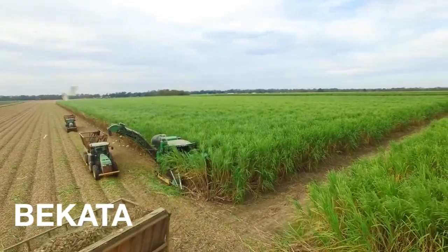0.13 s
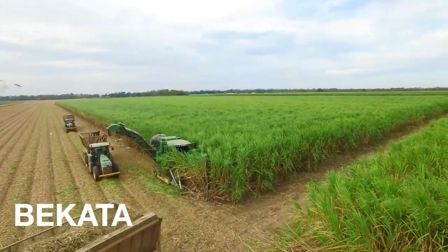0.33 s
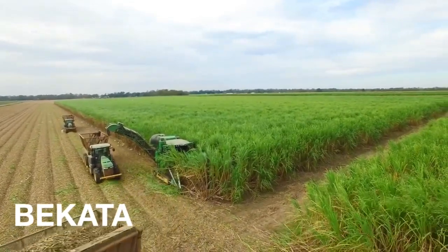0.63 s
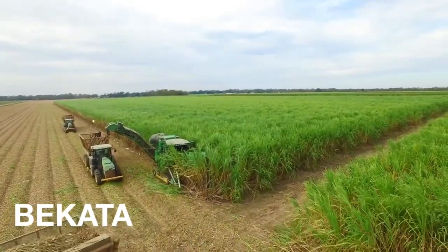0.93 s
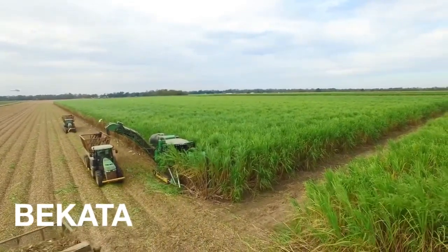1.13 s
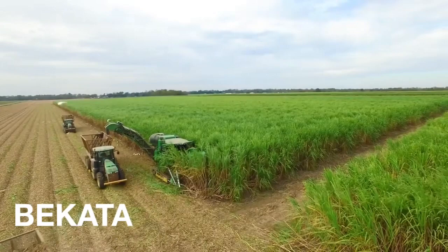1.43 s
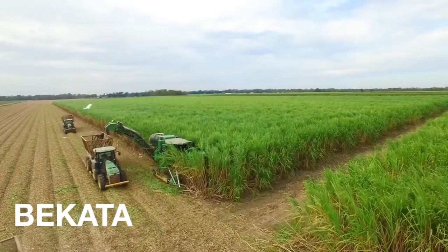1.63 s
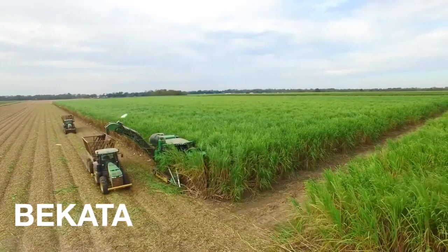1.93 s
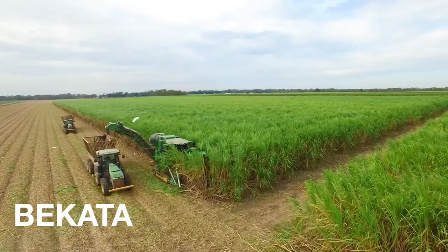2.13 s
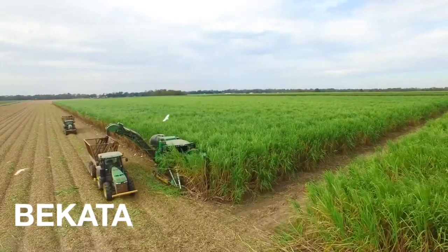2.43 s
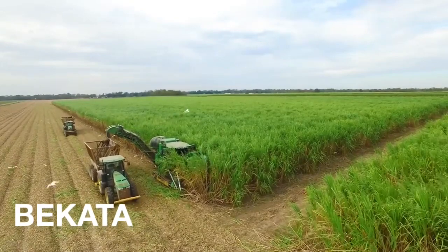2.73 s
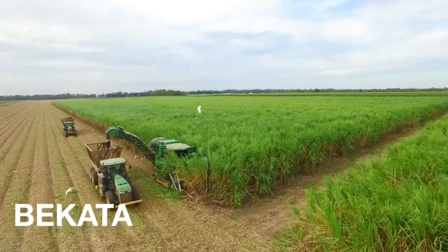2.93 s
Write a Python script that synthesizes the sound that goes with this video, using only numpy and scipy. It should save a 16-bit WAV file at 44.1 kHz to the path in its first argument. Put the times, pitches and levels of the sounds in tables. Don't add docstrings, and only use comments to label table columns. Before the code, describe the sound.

Sugarcane harvester rumbles close by, then cuts to buffeting wind over distant machine roar

```python
import sys
import numpy as np
from scipy import signal
from scipy.fft import rfft, irfft, next_fast_len
from scipy.io import wavfile
from scipy.ndimage import uniform_filter1d

SR = 44100
rng = np.random.default_rng(int(sys.argv[2]) if len(sys.argv) > 2 else 0)


def transcribe(u):
    v = np.clip(np.atleast_2d(u).T, -1, 1)
    q = np.round(v * 32767).astype(np.int16)
    wavfile.write(sys.argv[1], SR, q)


def elevation(decibels):
    levels = np.asarray(decibels, float)
    return 10 ** (levels / 20)


N = 136269
T = np.arange(N) / SR

# frequency in Hz, density in dB per Hz.
NEAR_RUMBLE = [(28, -14), (50, 1.5), (195, -3.5), (235, -9), (400, -19), (650, -12.5), (1200, -15.5),
               (2600, -19)]
# frequency in Hz, density in dB per Hz.
NEAR_HISS = [(2600, -2), (3440, -0.5), (4920, -6), (5910, -3.5), (7260, -6), (10000, -7), (10500, -11),
             (16500, -19)]
# pitch in Hz, width in Hz, level in dB.
PANELS = [(638, 93, 3.5), (1016, 46, 0.5), (1436, 43, 2), (1784, 13, -2), (2000, 12, -14), (2080, 26, 3)]
# time in seconds, level in dB.
GUSTS = [
    (0.25, -37.5),
    (0.37, -34),
    (0.97, -33.5),
    (1.35, -33),
    (1.78, -31.5),
    (2.17, -33),
    (2.54, -31),
    (2.69, -33),
    (3.09, -33),
]
# frequency in Hz, density in dB per Hz.
WIND_COLOUR = [(22, -13), (45, 1.5), (86, -3), (140, -5), (216, -11.5), (280, -15.5), (305, -36.5),
               (340, -70)]
# time in seconds, peak in dB, pitch in Hz, length in seconds.
EDDIES = [(0.495, -17.5, 61.4, 0.012), (.528, -20, 62.5, 0.0065), (.6, -23.5, 63, 0.015),
          (.635, -26, 121, 0.0206), (.85, -28, 65, 0.017), (.99, -23.5, 50.6, 0.022),
          (1.04, -28, 49.3, 0.014), (0.814, -25, 71, 0.012), (0.899, -18.5, 69.5, 0.014),
          (1.081, -15.5, 65, 0.01), (1.212, -24, 106, 0.0078), (1.33, -23, 57, 0.017),
          (1.437, -25, 75, 0.026), (1.547, -23.5, 59.5, 0.011), (1.593, -22.5, 61.4, 0.024),
          (1.912, -20.5, 90, 0.0089), (1.234, -26.5, 51, .025), (1.72, -23.5, 91, 0.014),
          (2.0, -27.5, 141.4, 0.018), (2.3, -32, 74, 0.015), (2.102, -21, 86, 0.0092),
          (2.391, -13.5, 84, .012), (2.419, -16.5, 82.4, 0.011), (2.551, -18.5, 80.4, .022),
          (2.596, -20, 88.5, 0.012), (2.643, -18, 92.5, 0.015), (2.887, -21.5, 102, 0.013),
          (2.912, -26.5, 50, 0.02)]
# time in seconds, roar in dB, rustle in dB.
FAR_EFFORT = [
    (0.25, -41.5, -56.5),
    (0.42, -38, -54),
    (0.55, -38, -53),
    (1.6, -35.5, -50),
    (2.13, -35.5, -49),
    (2.46, -37.5, -52),
    (3.09, -37, -51),
]
# frequency in Hz, density in dB per Hz.
ROAR_COLOUR = [(310, -26), (530, -12.5), (856, -1.5), (1080, 1), (1760, -2), (2070, -1), (3610, -12),
               (4800, -18.5), (6240, -66), (10600, -120)]
# frequency in Hz, density in dB per Hz.
DRONE_COLOUR = [(180, -4), (300, -8), (345, -1.5), (442, 6), (488, -3.5), (530, -18), (690, -41),
                (1170, -120)]
# frequency in Hz, density in dB per Hz.
RUSTLE_COLOUR = [(4300, -24), (4800, -3), (6600, -4), (7200, -3.5), (10000, -11), (10400, -16),
                 (15200, -24), (16000, -34)]
# pitch in Hz, level in dB, width in Hz.
WHINES = [(440.7, -59, 7.2), (1050, -57.5, 34), (1165, -59, 22), (2060, -56, 29), (3745, -63, 60),
          (7030, -80, 32)]
# time in seconds, peak in dB, pitch in Hz.
SNAPS = [
    (.4, -31, 4150),
    (.553, -46, 6500),
    (2.733, -39, 3900),
    (2.744, -45, 8500),
    (2.7502, -38, 3620),
    (2.9605, -40, 8300),
    (2.998, -53, 13000),
    (3.086, -48, 12500),
]
# frame number, lowest thinned Hz, share of lines kept, level of the rest in dB.
HOLLOWS = [
    (4, 4000, .04, -20),
    (32, 3400, .04, -21),
    (48, 3000, .07, -22),
    (51, 4200, .04, -24),
    (117, 3400, .08, -20),
]


def rms_one(x):
    return x / np.sqrt(np.mean(x ** 2) + 1e-20)


def in_time(rows):
    seconds, *columns = np.transpose(rows)
    return [np.interp(T, seconds, column) for column in columns]


def drift(rate_hz):
    r = np.exp(-80 * np.pi * rate_hz / SR)
    draws = rng.standard_normal(N // 40 + 2002)
    slow = signal.lfilter([1], [1, -2 * r, r * r], draws)[2000:]
    return np.interp(np.arange(N) / 40, np.arange(len(slow)), rms_one(slow))


def ring(x, hz, width_hz):
    r = np.exp(-np.pi * width_hz / SR)
    edge = (1 - r * r) / 2
    return signal.lfilter([edge, 0, -edge], [1, -2 * r * np.cos(2 * np.pi * hz / SR), r * r], x + 1e-18)


def ringing_noise(hz, width_hz):
    return ring(ring(rng.standard_normal(N), hz, width_hz), hz, width_hz)


def even(x):
    power = uniform_filter1d(x ** 2 + 1e-9, int(0.0417 * SR))
    return rms_one(x / power ** 0.33)


def turbulence(spectrum, shared_db, own_db, rate):
    hz, db = np.transpose(spectrum)
    size = next_fast_len(N)
    octave = np.log2(np.maximum(np.arange(size // 2 + 1) * SR / size, 1))
    colour = elevation(np.interp(octave, np.log2(hz), db, left=-120, right=-120))
    body = rfft(rng.standard_normal(size)) * colour
    out, shared = 0, shared_db * drift(rate)
    heard = np.log2(hz[db > -60])
    for centre in np.arange(np.floor(2 * heard[0]) / 2, heard[-1] + .5, .5):
        band = np.cos(np.pi * np.clip(octave - centre, -.5, .5)) ** 2
        flicker = elevation(shared + own_db * drift(rate * 1.85))
        out = out + irfft(body * band, size)[:N] * flicker
    return rms_one(out)


def near_panels():
    panels = 0
    for hz, width_hz, db in PANELS:
        panels = panels + elevation(db) * even(ring(rng.standard_normal(N), hz, width_hz))
    return rms_one(panels)


def near_machine():
    rumble = even(turbulence(NEAR_RUMBLE, shared_db=-1.0, own_db=-0.2, rate=58))
    hiss = turbulence(NEAR_HISS, shared_db=1.0, own_db=0.1, rate=81)
    return elevation(-27) * rumble + elevation(-34) * near_panels() + elevation(-35.5) * hiss


def eddies():
    front_hz, front_s = 256, 0.0018
    churn = even(ringing_noise(143, 82))
    out, cover = np.zeros(N), np.zeros(N)
    phases = rng.uniform(-0.62, 0.98, len(EDDIES))
    for (start, db, hz, length), phase in zip(EDDIES, phases):
        t = T - start
        bump = np.exp(-(t / length) ** 2)
        swing = np.cos(2 * np.pi * hz * t + phase)
        lopsided = swing + 0.25 * (2 * swing ** 2 - 1)
        front_level = elevation(-19 + 2.4 * (db + 16)) * 0.0083 / length
        front = np.exp(-(t / front_s + 1) ** 2) * np.cos(2 * np.pi * front_hz * t)
        out += elevation(db) * (bump * lopsided + front_level * front + elevation(-14.5) * churn * bump ** 0.54)
        cover = np.maximum(cover, bump)
    return out, cover


def wind():
    gust_db, = in_time(GUSTS)
    flow = even(turbulence(WIND_COLOUR, shared_db=0.0, own_db=2.5, rate=8.9))
    buffets, cover = eddies()
    return elevation(gust_db + 1 - 3.6 * cover) * flow + buffets


def cutter(roar_db):
    hiss = rms_one(ringing_noise(3090, 1640))
    swell_db = 2.85 * (roar_db - roar_db.mean())
    return elevation(-51.5 + swell_db + 2.34 * drift(6.2)) * hiss


def whines():
    out = 0
    for hz, db, width_hz in WHINES:
        out = out + elevation(db + 1.5 * drift(6.3)) * rms_one(ringing_noise(hz, width_hz))
    return out


def far_machines():
    roar_db, rustle_db = in_time(FAR_EFFORT)
    roar = elevation(roar_db) * turbulence(ROAR_COLOUR, shared_db=.5, own_db=0.7, rate=14.4)
    drone = elevation(-53.5) * turbulence(DRONE_COLOUR, shared_db=2.5, own_db=0.5, rate=12)
    rustle = elevation(rustle_db) * turbulence(RUSTLE_COLOUR, shared_db=0.3, own_db=1.13, rate=19)
    return roar + drone + rustle + cutter(roar_db) + whines()


def snaps():
    cycles = 13
    out = np.zeros(N)
    for start, db, hz in SNAPS:
        t = T - start
        out += elevation(db) * np.exp(-(t * hz / cycles) ** 2) * np.sin(2 * np.pi * hz * t)
    return out


def scene():
    change_s, fade_s = .2385, .001
    far = np.clip((T - change_s) / fade_s + .5, 0, 1)
    distant = wind() + far_machines() + snaps()
    return ((1 - far) * near_machine() + far * distant)[None]


def hollow_treble(x):
    hop = round(1024 / 48000 * SR)
    lead = 2 * hop - round(.0027 * SR)
    window = signal.windows.kaiser_bessel_derived(2 * hop, .1)
    x = np.pad(x, (lead, 3 * hop))
    out, hz = np.zeros(len(x)), np.arange(hop + 1) * SR / (2 * hop)
    hollows = {row[0]: row[1:] for row in HOLLOWS}
    for k in range(len(x) // hop - 1):
        span = slice(k * hop, (k + 2) * hop)
        lines = rfft(x[span] * window)
        stand = np.abs(lines) / (uniform_filter1d(np.abs(lines), size=31) + 1e-12)
        gain = np.where(hz > 2470, (stand + 1e-3) ** 0.072, 1)
        if k - 1 in hollows:
            above_hz, kept, rest_db = hollows[k - 1]
            weak = stand < np.quantile(stand, 1 - kept)
            weak = weak | ((hz > 8700) & (stand < 3.2))
            thinned = np.where(weak, elevation(rest_db), elevation(5.5))
            gain = np.where(hz > above_hz, thinned, gain)
        top = hz < 15720
        out[span] += irfft(lines * gain * top, 2 * hop) * window
    return out[lead:lead + N]


def top_cut(x):
    return signal.sosfilt(signal.butter(12, 16240, fs=SR, output="sos"), x)


def record(dry):
    bass_cut = signal.butter(4, 38, "high", fs=SR, output="sos")
    mic = signal.sosfilt(bass_cut, dry[0])
    mix = hollow_treble(mic)[None]
    return top_cut(mix)


dry = scene()
out = record(dry)
transcribe(out)
```